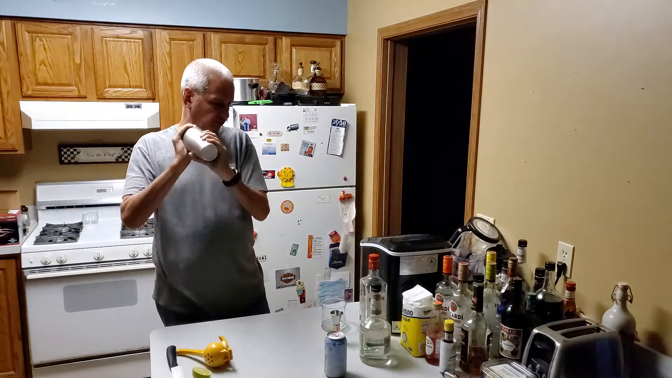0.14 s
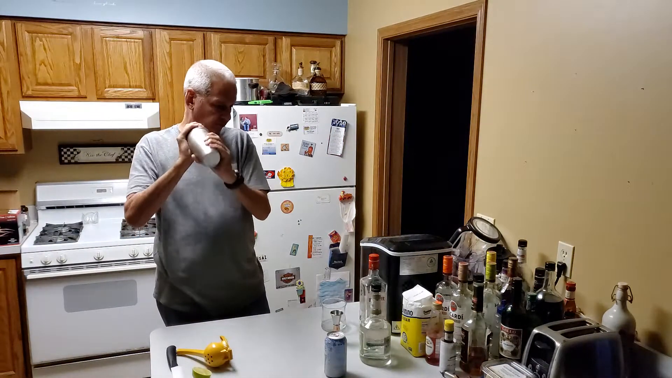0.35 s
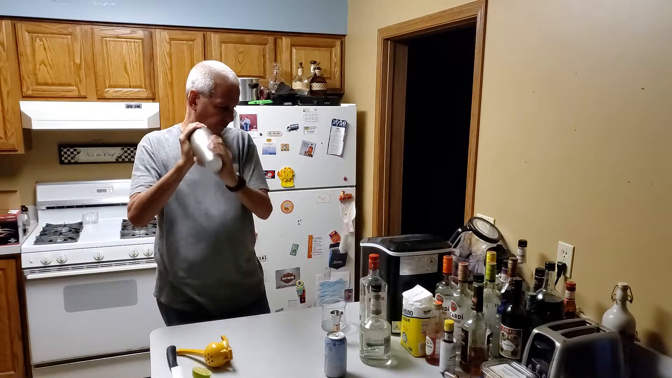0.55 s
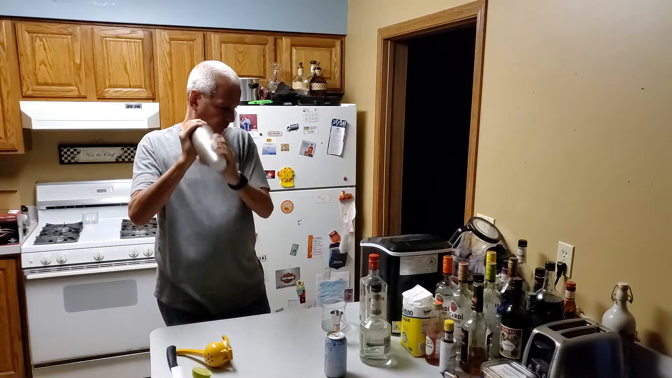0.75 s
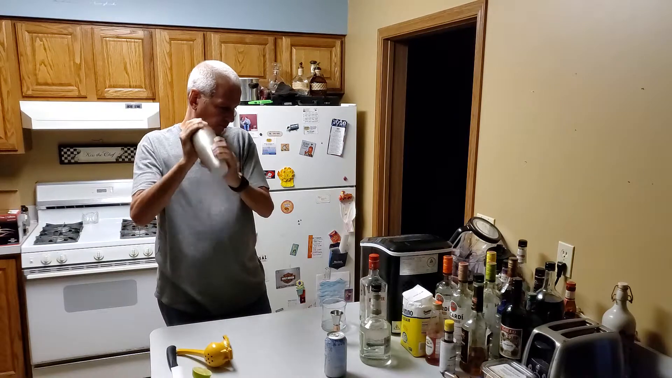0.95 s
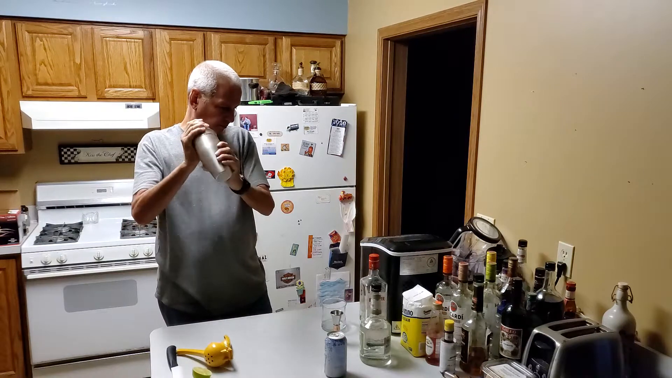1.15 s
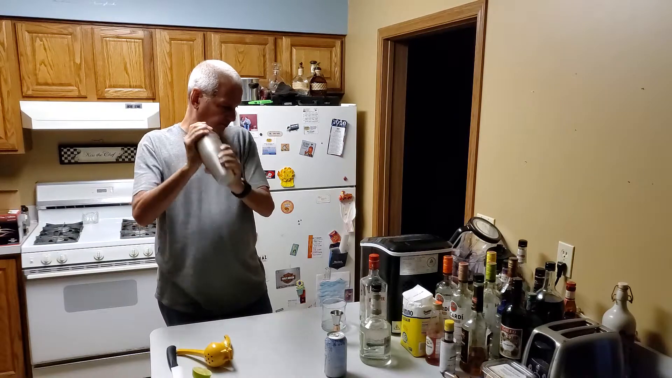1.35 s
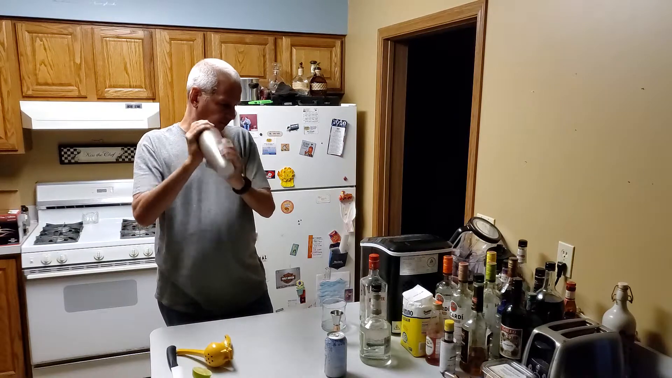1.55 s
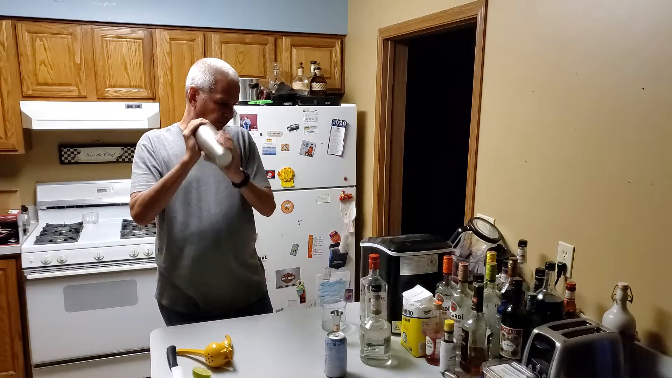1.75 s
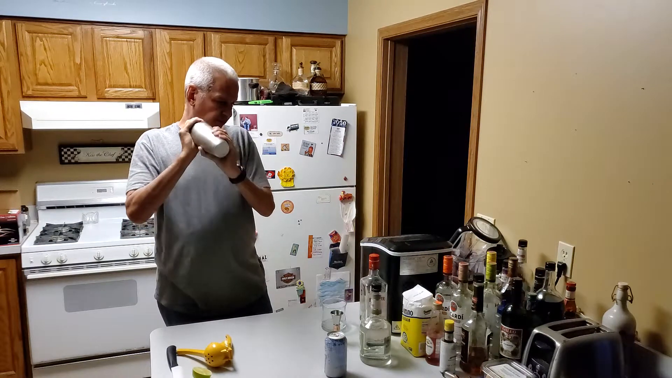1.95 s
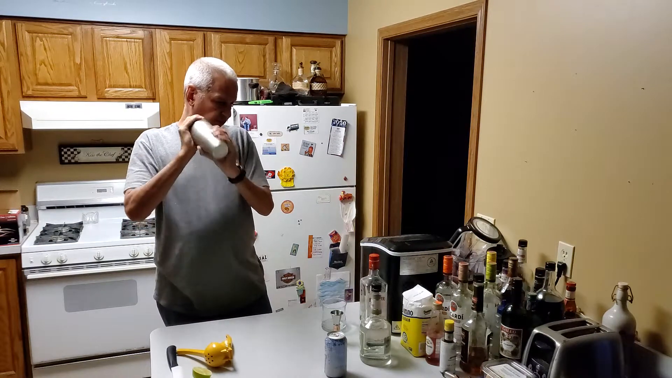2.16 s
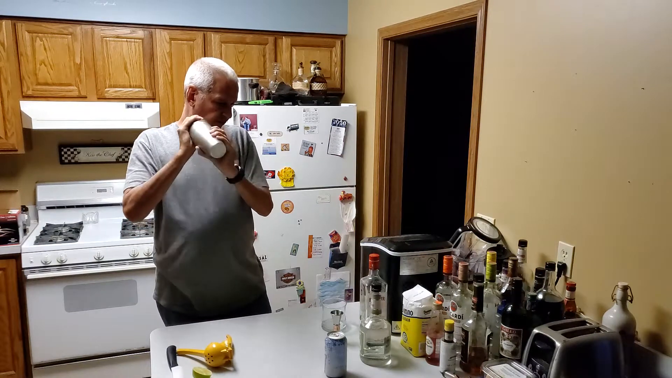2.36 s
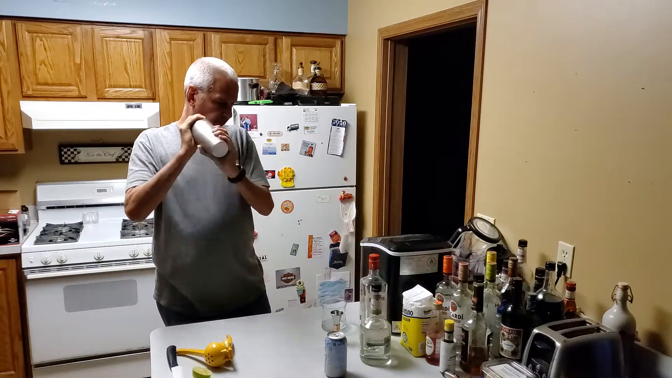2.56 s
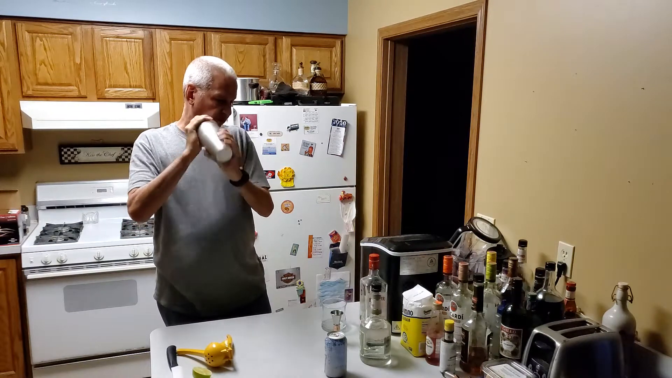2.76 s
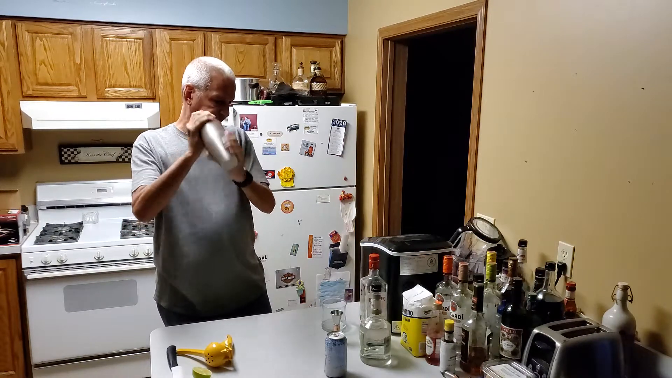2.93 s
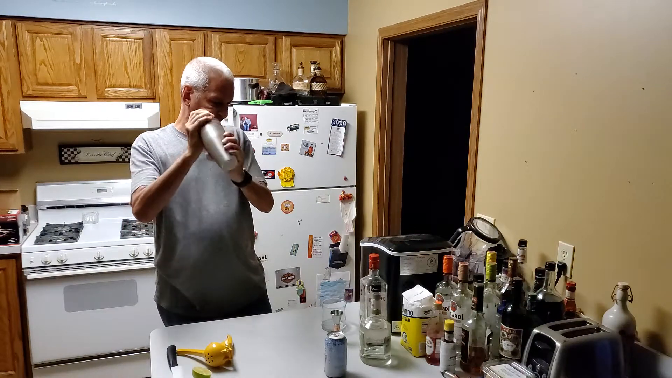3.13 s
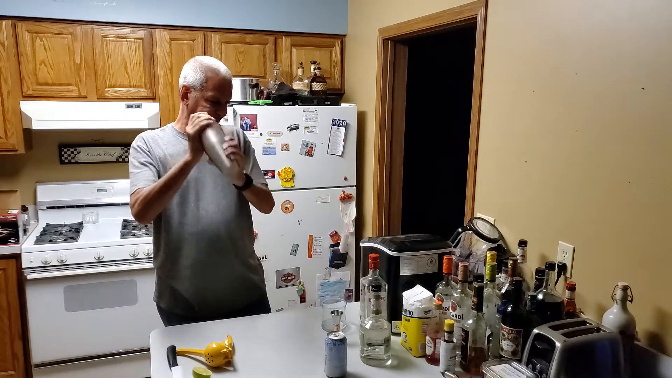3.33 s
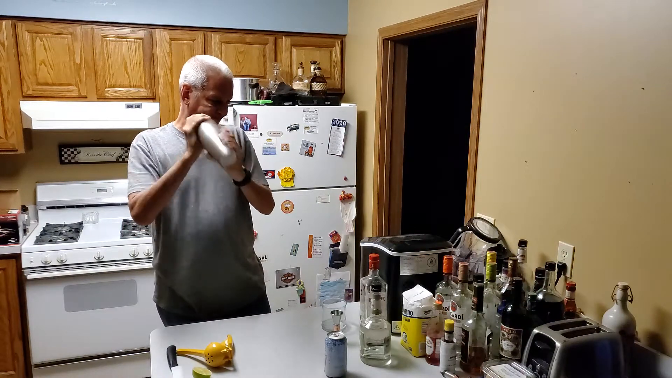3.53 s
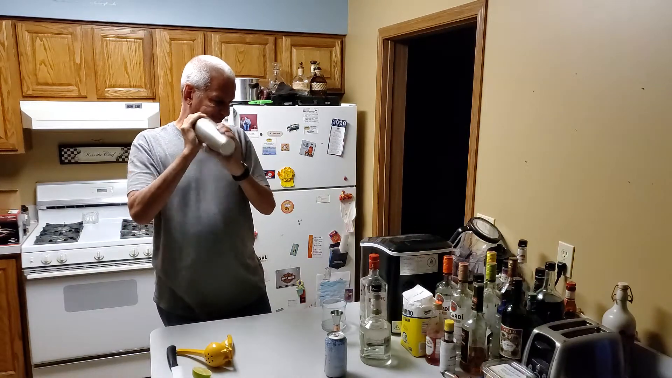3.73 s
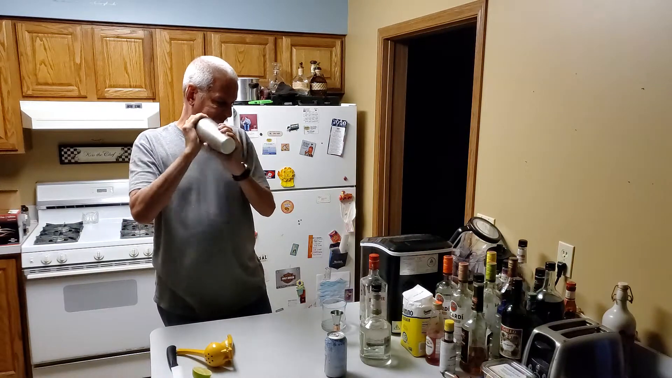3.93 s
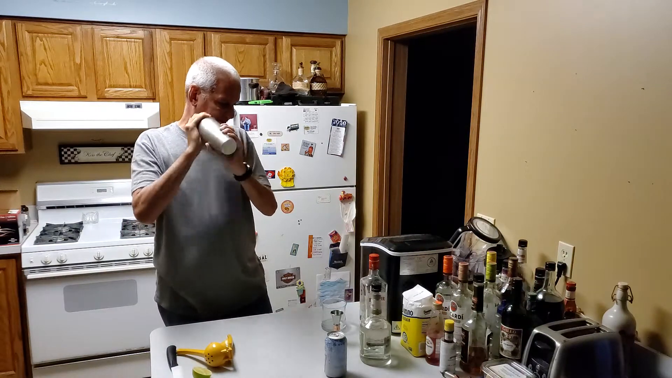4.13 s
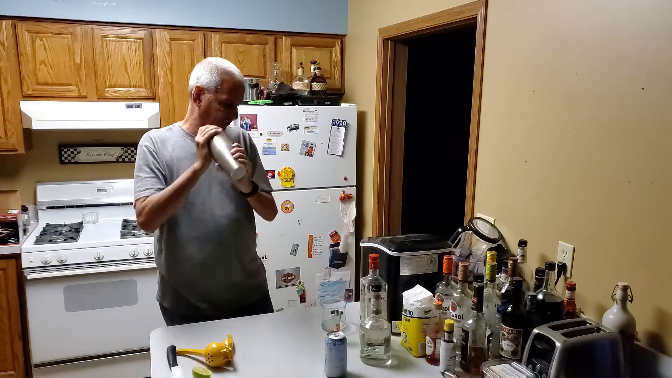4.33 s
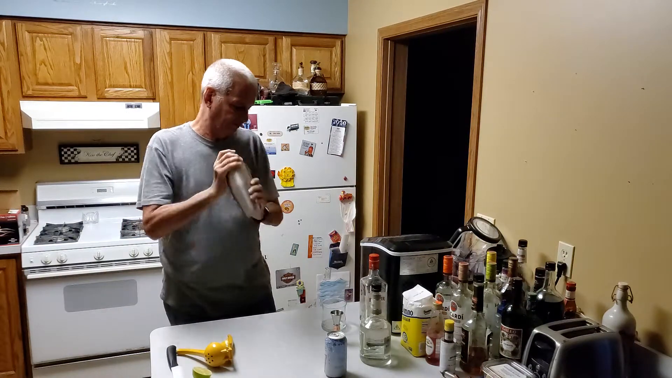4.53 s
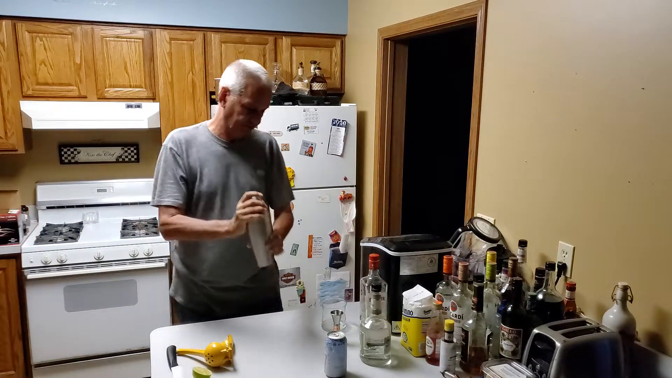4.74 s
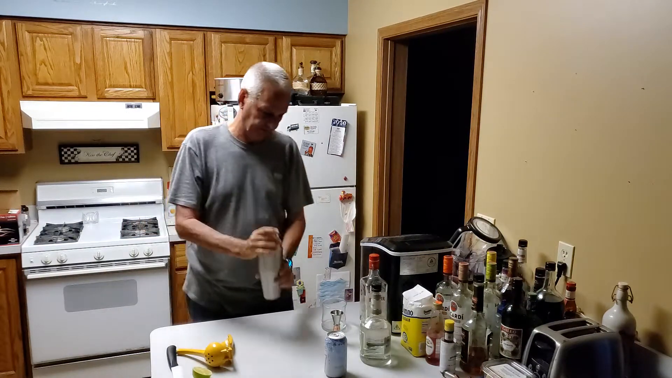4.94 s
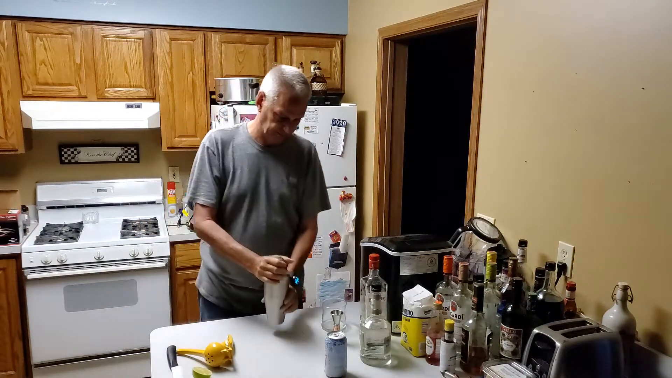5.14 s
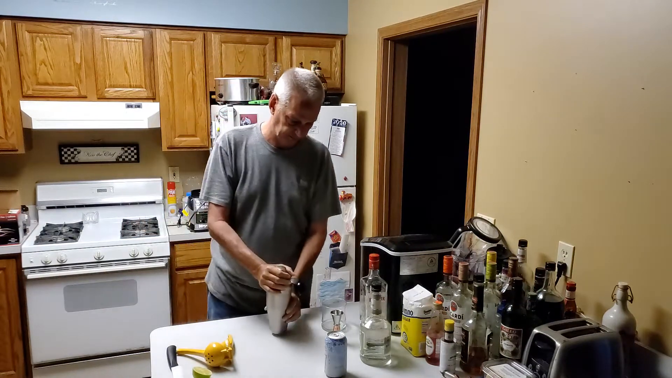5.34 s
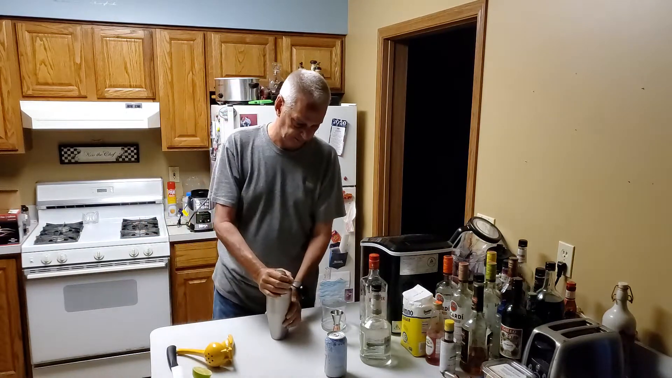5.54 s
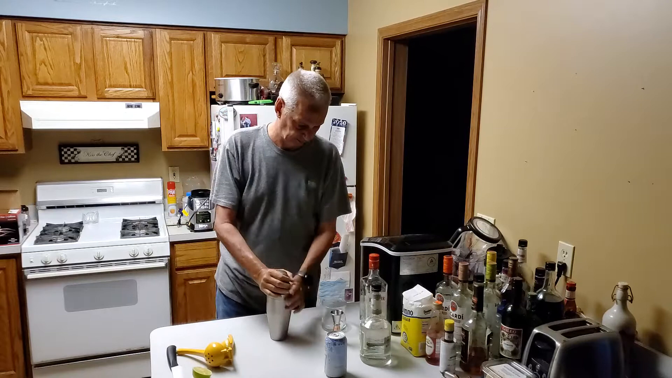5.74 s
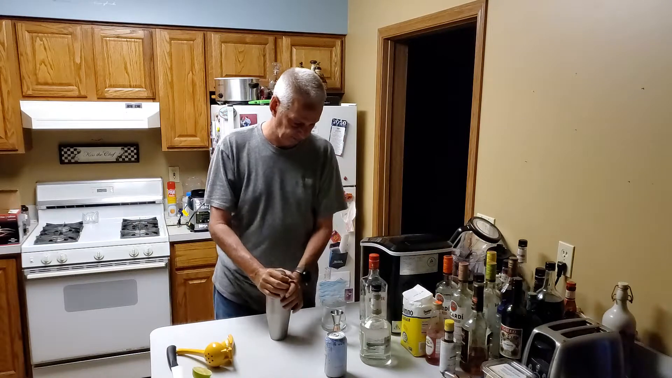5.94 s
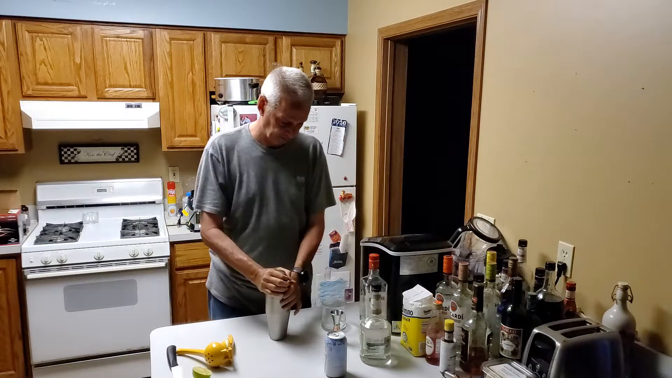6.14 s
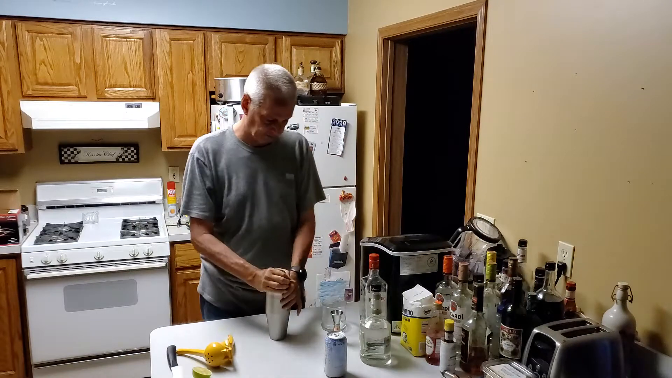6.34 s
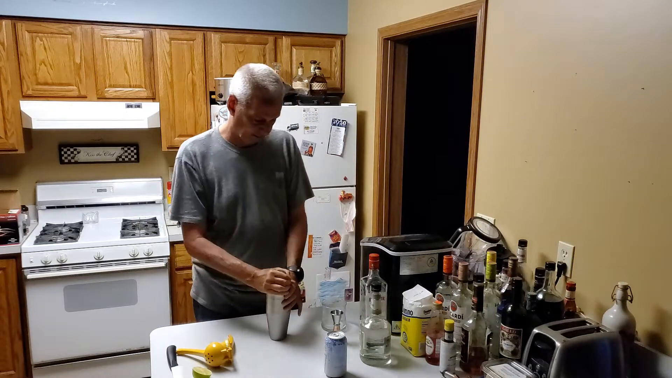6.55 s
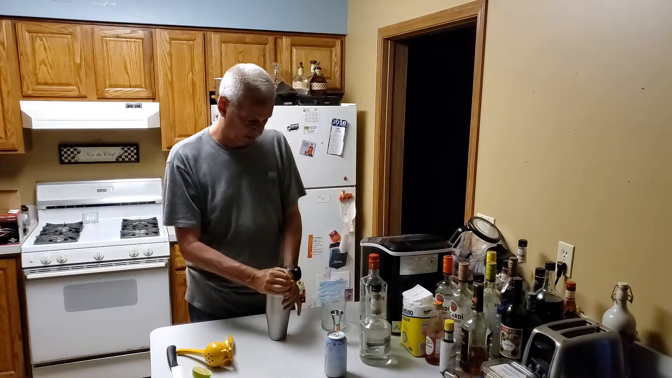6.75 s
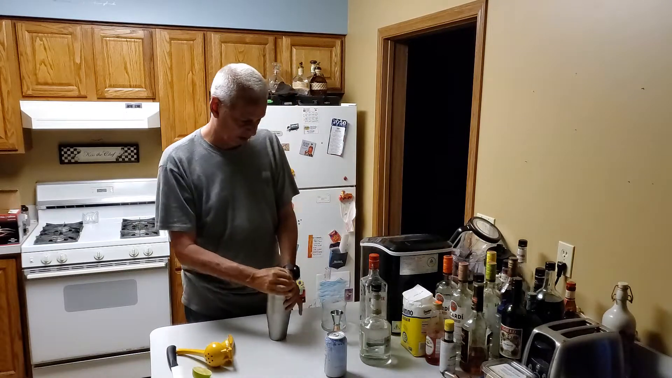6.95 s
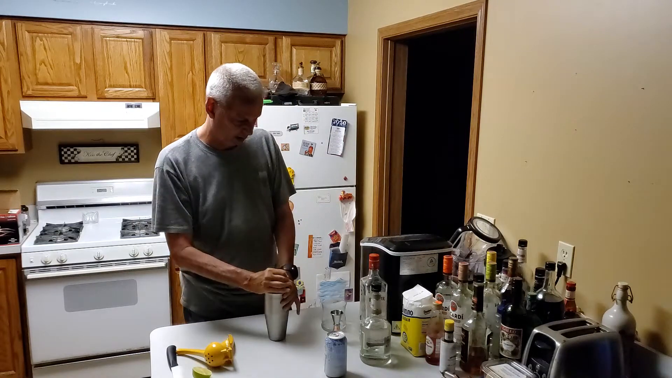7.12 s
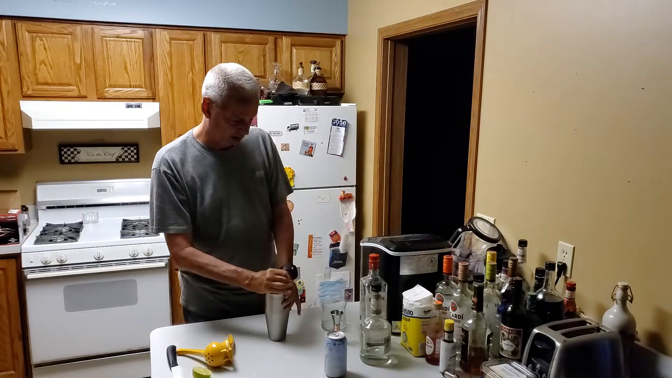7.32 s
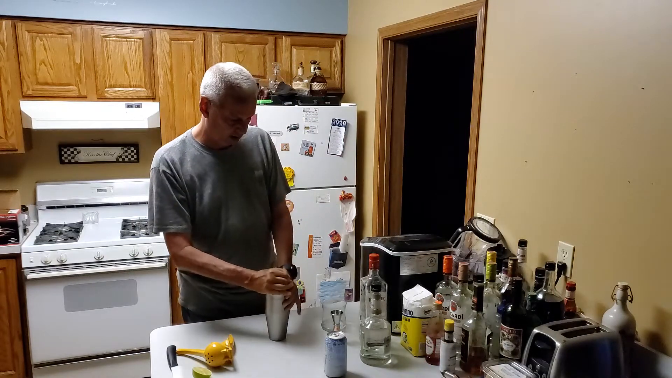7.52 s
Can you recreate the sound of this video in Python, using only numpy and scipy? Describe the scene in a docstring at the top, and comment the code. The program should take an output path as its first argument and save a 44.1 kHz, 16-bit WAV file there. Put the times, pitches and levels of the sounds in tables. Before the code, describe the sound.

Ice cubes slam and clatter back and forth inside a metal cocktail shaker in a quick, even rhythm for about five seconds. The rattle dies away with a few clinks, and the shaker is set down on a counter. Its top is then pushed and bumped, giving several muffled knocks and a louder one at the end. It is heard from a couple of metres away in a small kitchen with a quietly humming fridge.

```python
"""A small kitchen, two metres from a steel cocktail shaker full of ice and liquid, shaken hard.
Four to five times a second the load slams into one end with a hollow knock and a crack of ice,
then clatters back, over a steady churn of cubes ringing the thin wall. The shaking dies down and
the ice settles. The shaker thumps onto the counter, and its top is rubbed, pushed and bumped loose
with dull thuds and light clinks. A bed of fridge hum and air runs underneath."""
import sys
import numpy as np
from scipy import signal
from scipy.fft import rfft, irfft
from scipy.io import wavfile

SR = 44100
rng = np.random.default_rng(int(sys.argv[2]) if len(sys.argv) > 2 else 0)


def store_wav(level_fs):
    """Save 16-bit WAV to argv[1]."""
    pcm = np.round(np.clip(np.atleast_2d(level_fs), -1, 1) * 32767)
    wavfile.write(sys.argv[1], SR, pcm.T.astype(np.int16))


N = 338670
TAPS = 4096  # length of a body's ring in samples
HZ = np.fft.rfftfreq(TAPS, 1 / SR)

# partials of the fridge hum: (frequency [Hz], level [dB])
FRIDGE_PARTIALS = [(58.3, -53.5), (91.5, -69), (135, -72), (178, -67.5), (505, -66.5), (575, -65.5),
                   (608, -66.5), (715, -68), (6810, -84)]
# EQ of the room's air: (frequency [Hz], gain [dB])
AIR_EQ = [(20, -14), (38, -8), (58, 10), (85, -6.5), (170, -2), (250, 1.5), (420, 0.5), (680, -1),
          (830, -5), (1300, -12), (3300, -17), (5500, -25.5), (10000, -29.5), (15500, -33)]
# vigour of the shaking, as a fader on the churn: (time [s], level [dB])
CHURN_FADER = [(0, -29.5), (.25, -26), (.9, -25.5), (1.35, -28.5), (2.2, -27), (2.8, -30), (3.3, -28),
               (4, -27), (4.6, -27), (4.9, -30.5), (5.02, -36.5), (5.1, -45), (5.17, -46.5), (5.25, -57.5),
               (5.4, -62)]
# EQ of ice on wet steel: (frequency [Hz], gain [dB])
ICE_EQ = [(60, -38), (150, -22), (400, -16.5), (800, -13), (1250, -7), (1650, -3), (2400, 2), (3200, 0.5),
          (4500, -1), (6500, 1), (9000, -3), (12000, -3.5), (16000, -3.5)]
# resonances of the hand-held tin's wall: (frequency [Hz], width [Hz], boost [dB])
WALL_MODES = [(1678, 148, 6), (2045, 320, 3.5), (2290, 26, 3.5), (3060, 73, 2), (3350, 380, 3),
              (4210, 70, 2.5), (5760, 68, 3), (6260, 290, 2.5), (6630, 110, 5.5), (7000, 71, 4)]
# the load hits the end of the tin, once a stroke:
# (time [s], knock level [dB], pitch [Hz], hollow boost [dB], crack level [dB], pile-in time [s])
SLAM_CUES = [(.002, -29.5, 1190, 8, -26, .004), (.187, -16.5, 1600, 14.5, -18.5, .004),
             (.402, -17.5, 1490, 23, -20.5, .002), (.641, -26.5, 1630, 17, -22, .007),
             (.833, -23, 1610, 25, -18, .005), (1.066, -26, 1280, 13, -22, .011),
             (1.272, -30, 1620, 21, -24, .006), (1.525, -25.5, 1310, 7, -24, .011),
             (1.735, -31, 1090, 13, -24, .007), (1.94, -18, 1680, 12.5, -17.5, .004),
             (2.18, -17, 1450, 8.5, -21, .005), (2.393, -29, 1150, 4, -21, .005),
             (2.633, -32, 1610, 4, -26.5, .005), (2.827, -16, 1446, 21, -18, .003),
             (3.075, -20, 1400, 10.5, -22.5, .005), (3.301, -25, 1200, 0, -29, .005),
             (3.525, -26, 1510, 9, -24.5, .004), (3.726, -25.5, 1350, 11, -20, .009),
             (3.961, -23.5, 1630, 5, -20, .007), (4.192, -26, 1500, 9, -17, .008),
             (4.405, -20, 1530, 15, -21, .005), (4.618, -29, 1370, 9, -24.5, .006)]
# EQ of the knock: (frequency [Hz], gain [dB])
KNOCK_EQ = [(60, -53), (250, -15.5), (450, -15), (750, -6.5), (1100, 5), (1500, -2.5), (2000, 4), (3000, 2),
            (5000, -25), (16000, -44)]
# the knock's ring inside the tin: (frequency [Hz], width [Hz], boost [dB])
CAVITY_MODES = [(1143.6, 12, 8.4), (1315, 10, 6.6), (1410, 36, 5), (1496, 18, 9.5)]
# cubes fall back against the other end: (time [s], level [dB], pile-in time [s], ping boost [dB])
RETURN_CUES = [(0.07, -26, 0.0072, 17), (.279, -17.5, 0.012, 11), (.533, -28, .006, 28),
               (.714, -28, 0.0054, 10), (0.938, -23.5, 0.0037, 5), (1.182, -27, 0.0064, 24),
               (1.405, -17, 0.0064, 26), (1.635, -28, 0.0059, 25), (1.815, -20, 0.016, 18),
               (2.058, -21.5, 0.0086, 3), (2.5, -22, 0.0061, 7), (2.735, -23, 0.0037, 10),
               (2.958, -24, 0.0032, 10), (3.165, -19, 0.0092, 4.5), (3.382, -19.5, 0.0044, 8),
               (3.824, -19, 0.0092, 10), (4.066, -24, .005, 12), (4.317, -26, 0.0041, 15),
               (4.51, -20, 0.0093, 3), (4.727, -20, .003, 3.5)]
# large cubes clink and the top slips in its seat: (time [s], level [dB], pitch [Hz], boost [dB])
CLINK_CUES = [(4.625, -26.5, 2300, 20), (4.654, -26, 2250, 14), (5.045, -34.5, 1680, 8),
              (5.15, -38.5, 1720, 2.5), (5.381, -50, 3300, 0), (5.431, -46.5, 2570, -1),
              (5.742, -56.5, 3300, 1), (5.828, -47.5, 3600, 6), (5.956, -56, 6900, 9),
              (6.555, -56, 3330, 6), (6.825, -50.5, 3120, 8), (7.060, -51, 3300, 8), (7.321, -54, 3300, 1)]
# EQ of a clink: (frequency [Hz], gain [dB])
CLINK_EQ = [(100, 5), (900, -18), (1800, 10), (3300, 8.5), (5000, 4), (8000, 3.5), (11000, -2), (16000, -4)]
# the shaker lands on the counter, then the hand bumps its top:
# (time [s], level [dB], low-pass [Hz], pitch [Hz], boost [dB], clink level [dB], clink low-pass [Hz])
THUMP_CUES = [(5.574, -23, 1100, 412, 9.5, -51, 6000), (5.684, -49, 300, 130, 1, -65, 5040),
              (6.388, -45.5, 1200, 330, 7, -52, 15000), (6.680, -34, 870, 250, 5, -51.5, 9000),
              (6.905, -34.5, 1000, 270, 5, -54, 6000), (7.192, -35.5, 250, 160, 5, -51.5, 11000),
              (7.204, -33.5, 900, 150, 5.5, -54, 8000), (7.445, -38, 744, 150, 3, -50.5, 9000),
              (7.601, -20.5, 2110, 350, 5, -41, 4500)]
# EQ of a thump through the counter: (frequency [Hz], gain [dB])
COUNTER_EQ = [(30, -37), (70, -3), (125, -2.5), (180, -6.5), (250, 3.5), (400, -7), (620, -5), (1000, -9.5),
              (1900, -10.5), (3000, -26), (5000, -36), (16000, -25)]
# hollow resonances of the counter: (frequency [Hz], width [Hz], boost [dB])
COUNTER_MODES = [(139, 44, 7.1), (480, 57, 2), (610, 51, 6.3)]
# EQ of the top rubbing in its seat: (frequency [Hz], gain [dB])
RUB_EQ = [(300, -20), (1800, 0), (2600, -10), (4500, -6), (7000, -2), (11000, -6), (16000, -12)]
# early reflections off nearby surfaces: (delay [s], level [dB])
EARLY_ECHOES = [(.0023, -3.5), (0.0134, -5)]
# decay of the kitchen reverb: (frequency [Hz], t60 [s])
REVERB_T60 = [(100, 0.53), (260, 0.11), (700, 0.3), (1800, 0.21), (5000, 0.26), (15000, 0.041)]
# likeness of diffuse sound at the two microphones: (frequency [Hz], correlation [-1 to 1])
STEREO_LIKENESS = [(100, 0.87), (350, 0.95), (600, 0.37), (1000, 0.17), (1600, -0.026), (3000, -0.059),
                   (16000, 0.083)]
# EQ of the two microphone ports: (frequency [Hz], left gain [dB], right gain [dB])
PORT_EQ = [(1570, -0.5, 0), (3200, 1, -1.5), (4350, 1.5, 1), (6730, -3, 0.5), (7870, 4, -3),
           (9200, -8, 0.5), (9000, -9, 5.5), (12100, -4.5, 3), (13600, -3.5, -2.5), (15700, -8, -1.5)]

SHAKE_LAG, COUNTER_LAG = 6, 3  # samples by which the right microphone leads: in the hand, on the counter


def gain_of(db):
    return 10 ** (np.asarray(db) / 20)


def unit_rms(x):
    return x / np.sqrt(np.mean(x ** 2) + 1e-20)


def curve(points, hz=HZ):
    """Joins points by straight lines on a log-frequency axis."""
    f, value = np.transpose(points)
    return np.interp(np.log(hz + 1), np.log(f + 1), value)


def add(mix, s, sound):
    """Drops a stereo sound into the mix at time s."""
    part = mix[:, max(round(s * SR), 0):][:, :sound.shape[1]]
    part += sound[:, :part.shape[1]]


def peaks(modes):
    """Resonances as bell boosts in dB; a negative setting boosts too."""
    bells = ((gain_of(abs(db)) ** 2 - 1) / (1 + (2 * (HZ - hz) / width) ** 2) for hz, width, db in modes)
    return 10 * np.log10(1 + sum(bells))


def low_pass(corner_hz, steepness=3):
    """A treble roll-off in dB."""
    return -10 * np.log10(1 + (HZ / corner_hz) ** steepness)


def ring(eq_db):
    """The minimum-phase ring, of energy 1, of a struck body with this EQ."""
    log_gain = np.log(gain_of(np.r_[eq_db, eq_db[-2:0:-1]]) + 1e-6)
    taps = np.fft.ifft(np.exp(np.conj(signal.hilbert(log_gain)))).real
    return taps / np.linalg.norm(taps)


def diffuse(size, eq=((1, 0), (2, 0))):
    """Noise from all sides: near mono in the bass, wide in the treble."""
    hz = np.fft.rfftfreq(size, 1 / SR)
    likeness = np.clip(curve(STEREO_LIKENESS, hz), -1, 1)
    noise = rfft(rng.standard_normal((2, size)))
    mid, side = noise * np.sqrt([1 + likeness, 1 - likeness]) * gain_of(curve(eq, hz))
    return unit_rms(irfft([mid + side, mid - side], size))


def kitchen(x, wet_db, lag=SHAKE_LAG, hold_s=0.031, size=11025):
    """Direct sound, two early echoes, then a dense tail that holds briefly and dies band by band."""
    hz, t, bands = signal.stft(diffuse(size), SR, nperseg=256)
    fading_s = np.hypot(t, hold_s) - hold_s
    decay = gain_of(-60 * fading_s / curve(REVERB_T60, hz)[:, None])
    tail = signal.istft(bands * decay, SR, nperseg=256)[1]
    tail *= 1 - np.exp(-np.arange(tail.shape[1]) / SR / 0.0016)
    paths = gain_of(wet_db) * tail / np.linalg.norm(tail[0])
    paths[[0, 1], [lag, 0]] += 1  # direct sound
    for delay, db in EARLY_ECHOES:
        at = int(delay * SR * rng.uniform(.75, 1.25))  # the paths change as the shaker moves
        paths[[0, 1], at + rng.integers(0, 12, 2)] += gain_of(db)
    return signal.oaconvolve(x[None], paths / np.linalg.norm(paths[0]), axes=1)


def room_hit(x, db, wet_db, lag=SHAKE_LAG):
    """Sends a hit through the kitchen and gives it the energy of 20 ms at the level db."""
    heard = kitchen(x, wet_db, lag)
    return gain_of(db) * heard * np.sqrt(2 * SR / 50 / np.sum(heard ** 2))


def fridge_and_air(air_db=-52.5, waver=0.23, drift_s=0.00059):
    """The bed: steady air and a fridge hum whose partials waver in level and pitch."""
    t = np.arange(N) / SR
    knots = np.linspace(0, t[-1], 24)
    hum = np.zeros(N)
    for hz, db in FRIDGE_PARTIALS:
        swell, drift = (np.interp(t, knots, rng.standard_normal(len(knots))) for _ in range(2))
        tone = np.sqrt(2) * np.sin(2 * np.pi * hz * (t + drift_s * drift))
        hum += gain_of(db) * (1 + waver * swell) * tone
    return hum + gain_of(air_db) * diffuse(N, AIR_EQ)


def bending(x, spread_s=0.001185):
    """Bending waves in thin steel carry treble faster than bass, smearing a click into a burst."""
    delay = spread_s * (1 - np.sqrt(HZ / HZ[-1])) * rng.uniform(0.603, 1.38)
    return irfft(rfft(x) * np.exp(-2j * np.pi * np.cumsum(delay) * HZ[1]))


def cube(db_per_octave=0, uneven_db=1.5, ping_db=0):
    """One cube on the wall: each spot of the tin has its own colour, and a hard corner pings."""
    spot = np.interp(HZ, np.linspace(0, SR / 2, 30), rng.standard_normal(30))
    tilt = db_per_octave * np.log2(np.maximum(HZ, 1000) / 4000)
    ping = peaks([(6160, 3600, ping_db)])
    return bending(ring(curve(ICE_EQ) + peaks(WALL_MODES) + ping + uneven_db * spot + tilt))


def effort(t):
    """Vigour of the shaking in dB at the times t."""
    return np.interp(t, *np.transpose(CHURN_FADER), right=-100)


def flight(t, hits, length_s=0.045):
    """The load flies free: rises to 1 just before each hit and drops to 0 as it lands."""
    wait_s = np.r_[hits, np.inf][np.searchsorted(hits, t)] - t
    return np.exp(-(wait_s / length_s) ** 2)


def surge(t, swell_db=0.16, push_db=0.5, duck_db=1.5):
    """The churn's pulse in dB: two faint swells a stroke, a push into slams, a duck before returns."""
    slam_s, return_s = np.array(SLAM_CUES)[:, 0], np.array(RETURN_CUES)[:, 0]
    strokes = np.interp(t, slam_s, np.arange(len(slam_s)))
    swell = swell_db * np.cos(2 * np.pi * 2 * (strokes - 0.079)) * (t < slam_s[-1])
    return swell + push_db * flight(t, slam_s) - duck_db * flight(t, return_s)


def churn(hits_per_s=360, spread_db=4.0, layers=10):
    """A dense rattle of dull cubes and bright chips; it darkens and rings more as the shaking fades."""
    t = np.arange(N) / SR
    rattle = np.zeros((2, N))
    for db_per_octave in np.linspace(-2.05, 2.05, layers):
        hit = rng.random(N) < hits_per_s / layers / SR
        force = rng.laplace(size=N)
        clicks = hit * np.sign(force) * gain_of(spread_db * np.minimum(abs(force), 3.5))
        strike = kitchen(cube(db_per_octave, uneven_db=3.5), wet_db=5)
        rattle += signal.oaconvolve(clicks[None], strike, axes=1)[:, :N]
    wall_eq = 0.3 * peaks(WALL_MODES) + peaks([(1720, 86, 4.6), (3430, 250, 2.8)])
    mellow = ring(wall_eq + low_pass(3000, steepness=2))
    rolling = signal.oaconvolve(rattle, mellow[None], axes=1)[:, :N]
    softness = np.clip((-29.5 - effort(t)) / 11, 0, 1)
    blend = (1 - softness) * rattle / rattle.std() + softness * rolling / rolling.std()
    return gain_of(effort(t) + surge(t)) * blend


def contacts(pile_s, trailing_db, count=24):
    """A first contact, then a spray of smaller ones."""
    delay = rng.gamma(2, pile_s, count)
    force = rng.standard_normal(count)
    train = np.zeros(TAPS)
    np.add.at(train, (delay * SR).astype(int) % TAPS, gain_of(trailing_db) * force / np.linalg.norm(force))
    train[0] += 1
    return train


def pile(pile_s, usual_s=0.0049):
    """Cubes pile in: the slower they land, the more energy trails the first contact."""
    return contacts(pile_s, trailing_db=-3.5 + 10 * np.log10(pile_s / usual_s))


def slams(width_hz=167, crack_stretch=1.6):
    """The packed load knocks the end of the tin, which rings hollow, under a longer crack of ice."""
    out = np.zeros((2, N))
    for s, db, hz, hollow_db, crack_db, pile_s in SLAM_CUES:
        body = ring(curve(KNOCK_EQ) + peaks(CAVITY_MODES) + peaks([(hz, width_hz, hollow_db)]))
        knock = signal.fftconvolve(pile(pile_s), body)
        add(out, s, room_hit(knock, db, wet_db=2.5))
        crack = signal.fftconvolve(pile(crack_stretch * pile_s), cube())
        add(out, s, room_hit(crack, crack_db, wet_db=7))
    return out


def scattered(start_s, end_s, per_s):
    """Loose timing: one hit at a random place in each equal slot."""
    slots = np.arange(start_s, end_s, 1 / per_s)
    return slots + rng.random(200)[:len(slots)] / per_s


def stray_cubes(trim_db=-2.5, scatter_db=3.5):
    """Single large cubes hit the wall off the beat, riding the level of the churn."""
    out = np.zeros((2, N))
    for s in scattered(0, RETURN_CUES[-1][0], per_s=14):
        strike = cube(db_per_octave=-3.0 * rng.random(), uneven_db=6.0, ping_db=3.5 * rng.random())
        db = effort(s) + surge(s) + trim_db + scatter_db * rng.uniform(-0.78, 1)
        add(out, s, room_hit(strike, db, wet_db=7))
    return out


def returns():
    """On the back stroke the loose cubes clatter against the steel in a quick bunch."""
    out = np.zeros((2, N))
    for s, db, pile_s, ping_db in RETURN_CUES:
        clatter = signal.fftconvolve(pile(pile_s), cube(db_per_octave=-0.45, ping_db=ping_db))
        add(out, s, room_hit(clatter, db, wet_db=4.5))
    return out


def clink(db, hz, boost_db, corner_hz=12000, q=13, tail_db=-8.5, tail_t60_s=0.47, size=16384):
    """A tap on the loosely held tin rings on, favouring one pitch; corner_hz sets its brightness."""
    eq = curve(CLINK_EQ) + peaks(WALL_MODES) + peaks([(hz, hz / q, boost_db)]) + low_pass(corner_hz)
    steel = bending(ring(eq))
    tail = rng.standard_normal(size) * gain_of(-60 * np.arange(size) / SR / tail_t60_s)
    drive = gain_of(tail_db) * tail / np.linalg.norm(tail)
    drive[:TAPS] += contacts(pile_s=.002, trailing_db=-6.0)
    return room_hit(signal.fftconvolve(drive, steel), db, wet_db=1.5, lag=COUNTER_LAG)


def small_clinks():
    """Spot clinks of cubes and the slipping top, and a faint sprinkle of settling ice."""
    out = np.zeros((2, N))
    for s, db, hz, boost_db in CLINK_CUES:
        add(out, s, clink(db, hz, boost_db))
    for s in scattered(5.25, 5.9, per_s=9.8):
        add(out, s, clink(db=-57 + rng.uniform(-1.7, 2), hz=2000 * 2 ** rng.uniform(-.5, .5), boost_db=4))
    return out


def counter_thumps(width_hz=150):
    """Dull thuds carried into the counter, each with its own low-pass and a clink of the tin on top."""
    out = np.zeros((2, N))
    for s, db, corner_hz, hz, boost_db, clink_db, clink_corner_hz in THUMP_CUES:
        pitch = peaks([(hz, width_hz, boost_db)])
        body = ring(curve(COUNTER_EQ) + peaks(COUNTER_MODES) + pitch + low_pass(corner_hz))
        add(out, s, room_hit(body, db, wet_db=2.0, lag=COUNTER_LAG))
        add(out, s, clink(clink_db, hz=3020, boost_db=5, corner_hz=clink_corner_hz))
    return out


def top_rub(peak_s=6.06, spread_s=.1, db=-65.5):
    """The gripped top slides in its seat, wet steel on steel: one soft swell of hiss."""
    t = np.arange(N) / SR
    swell = np.exp(-((t - peak_s) / spread_s) ** 2 / 2)
    return gain_of(db) * swell * diffuse(N, RUB_EQ)


def scene():
    """The mix: the kitchen bed, the shaking, the handling on the counter and the loose ice details."""
    bed = fridge_and_air()
    shaking = churn() + slams() + returns()
    handling = counter_thumps() + top_rub()
    return bed + shaking + handling + small_clinks() + stray_cubes()


def record(dry, cutoff_hz=15850):
    """Each microphone port adds its own colour, then a steep low-pass trims the top."""
    ports, hz = np.array(PORT_EQ), np.fft.rfftfreq(N, 1 / SR)
    left_db, right_db = curve(ports[:, [0, 1]], hz), curve(ports[:, [0, 2]], hz)
    coloured = irfft(rfft(dry) * gain_of([left_db, right_db]), N)
    high_cut = signal.firwin(511, cutoff_hz, window=("kaiser", 9), fs=SR)
    return signal.oaconvolve(coloured, high_cut[None], "same")


dry = scene()
out = record(dry)
store_wav(out)
```